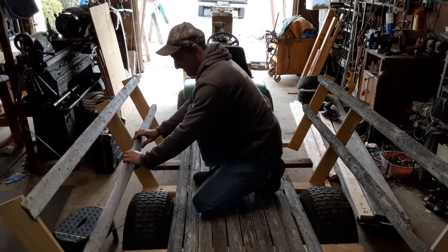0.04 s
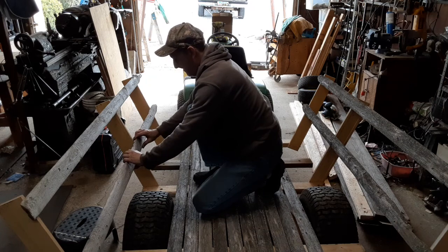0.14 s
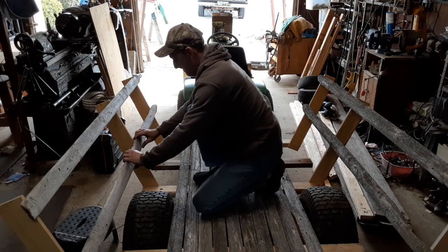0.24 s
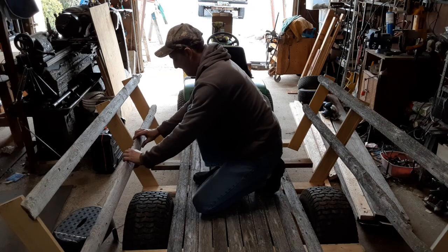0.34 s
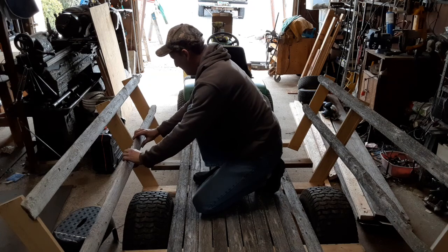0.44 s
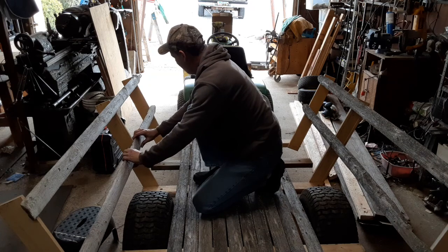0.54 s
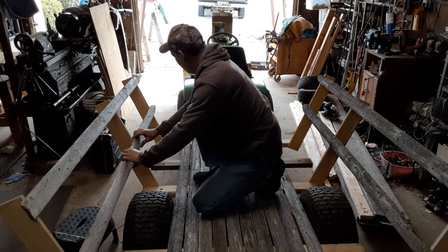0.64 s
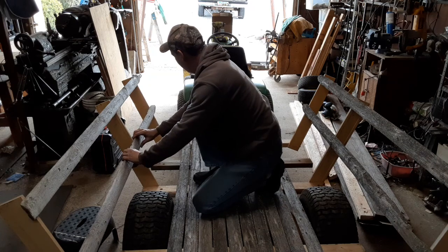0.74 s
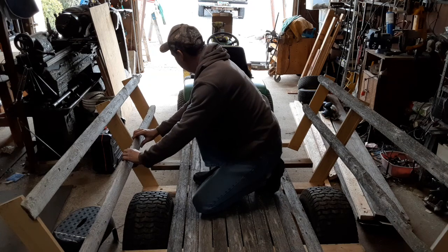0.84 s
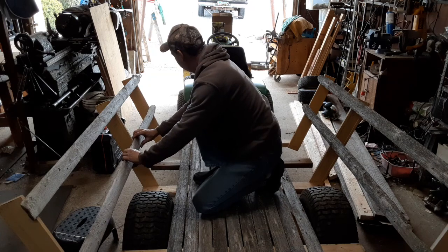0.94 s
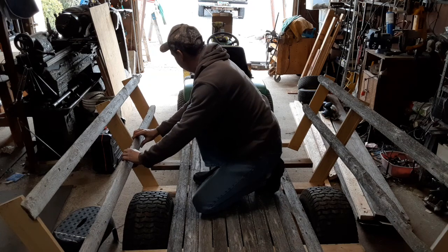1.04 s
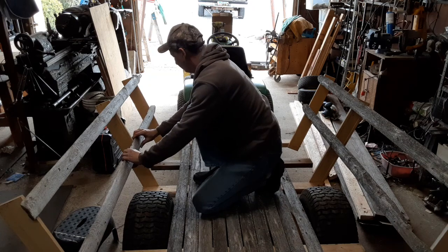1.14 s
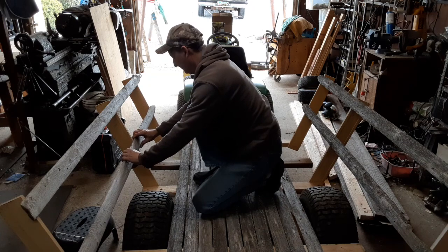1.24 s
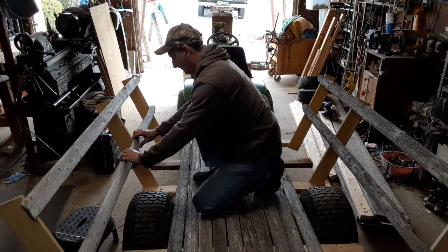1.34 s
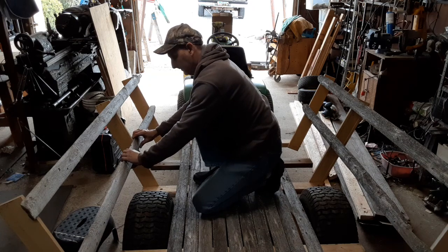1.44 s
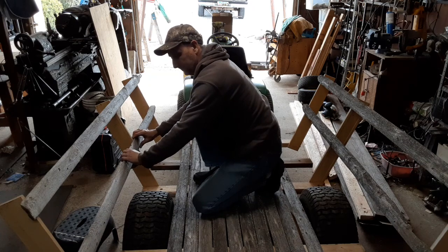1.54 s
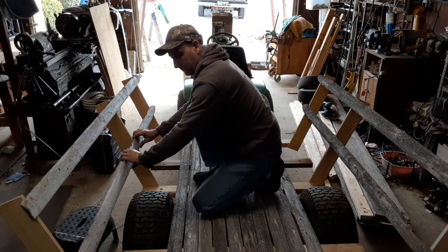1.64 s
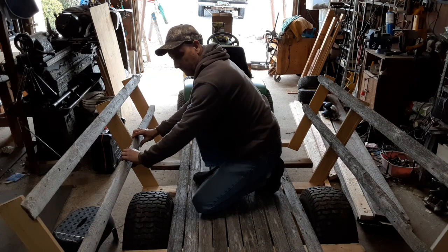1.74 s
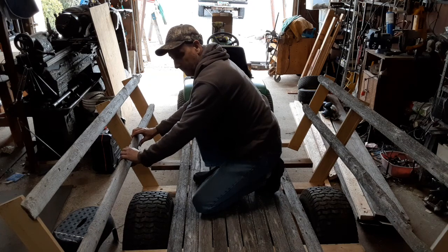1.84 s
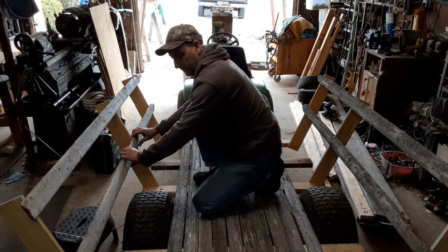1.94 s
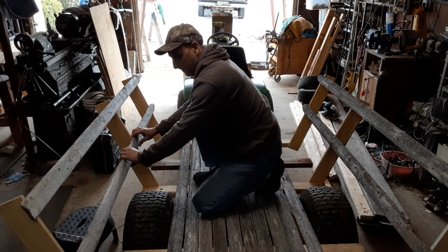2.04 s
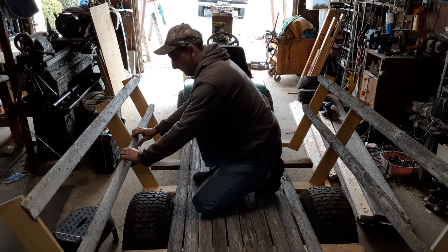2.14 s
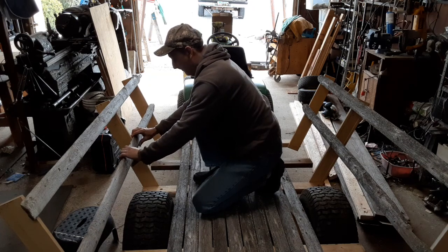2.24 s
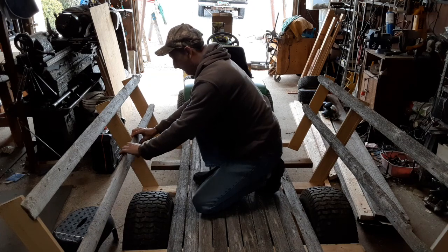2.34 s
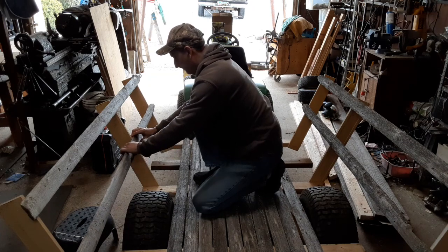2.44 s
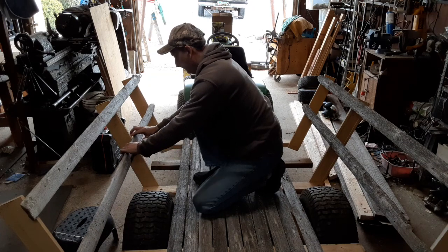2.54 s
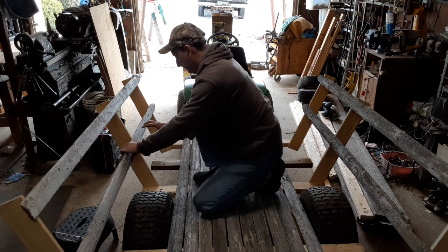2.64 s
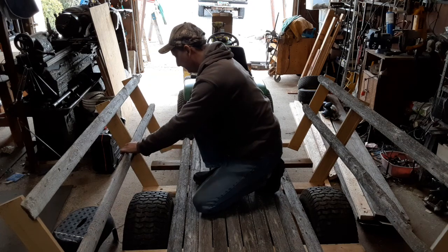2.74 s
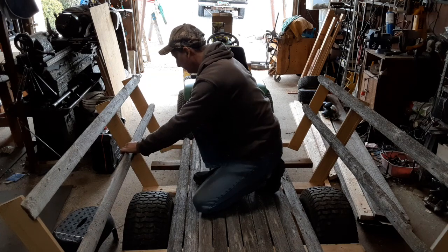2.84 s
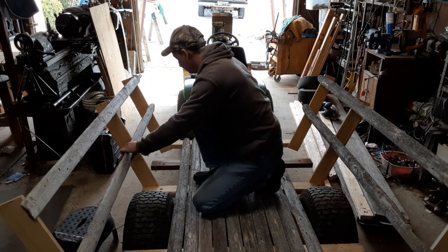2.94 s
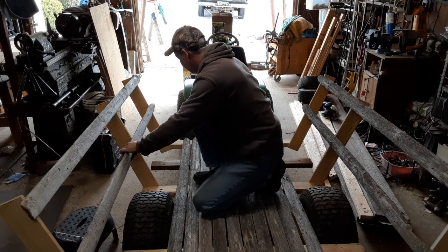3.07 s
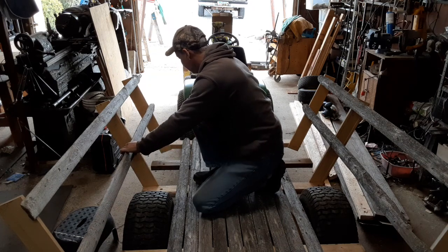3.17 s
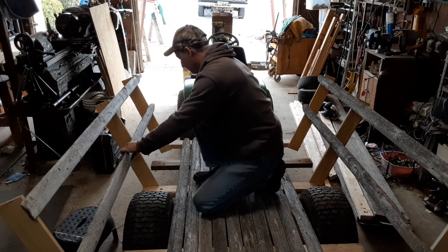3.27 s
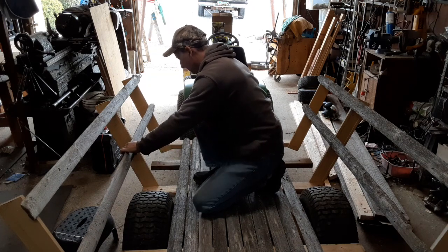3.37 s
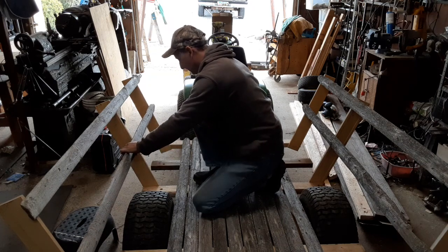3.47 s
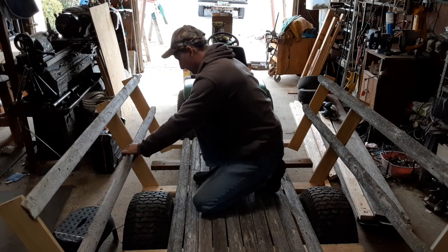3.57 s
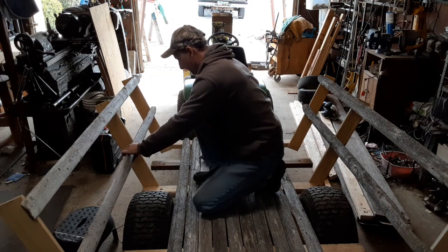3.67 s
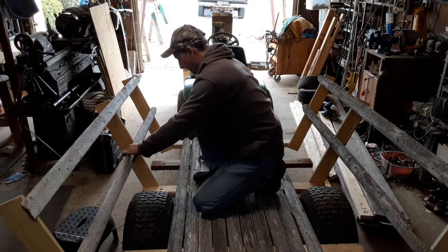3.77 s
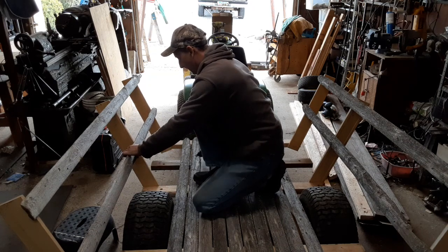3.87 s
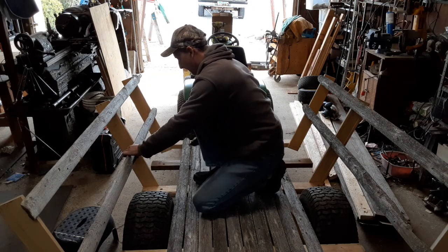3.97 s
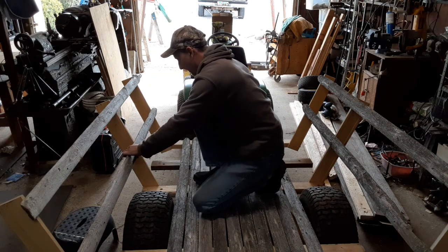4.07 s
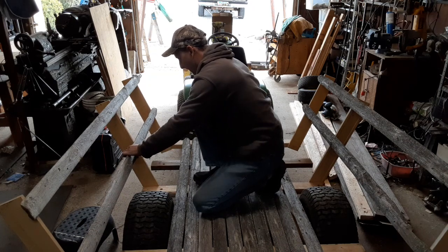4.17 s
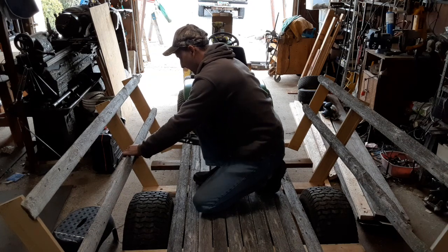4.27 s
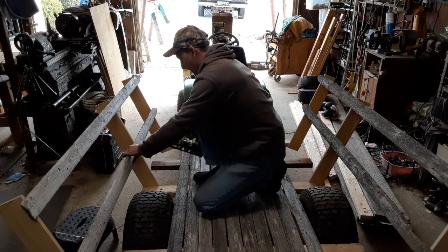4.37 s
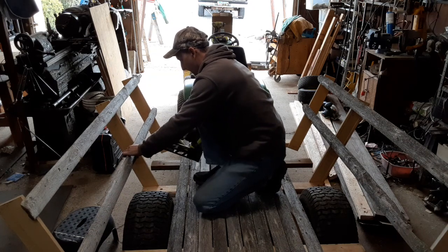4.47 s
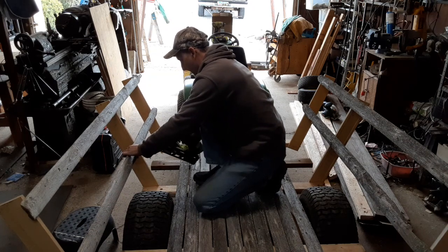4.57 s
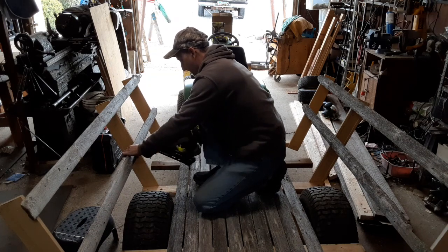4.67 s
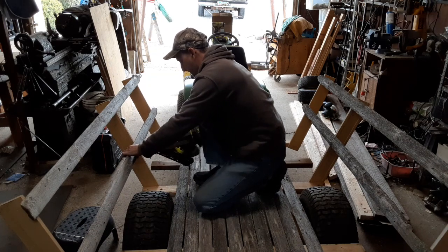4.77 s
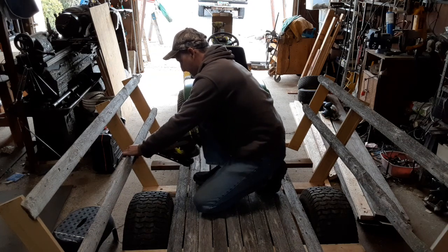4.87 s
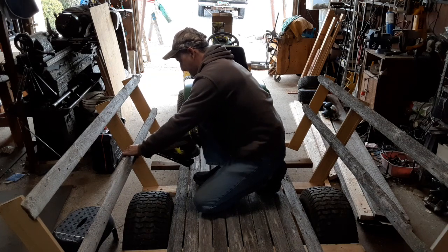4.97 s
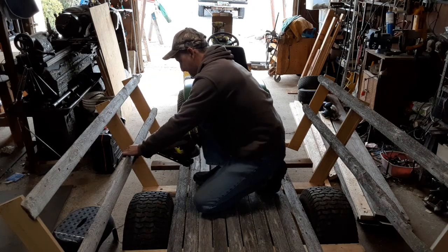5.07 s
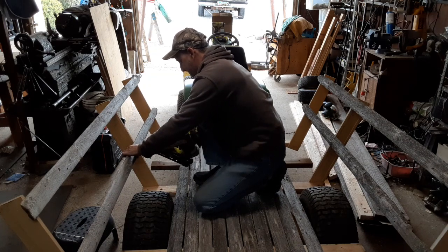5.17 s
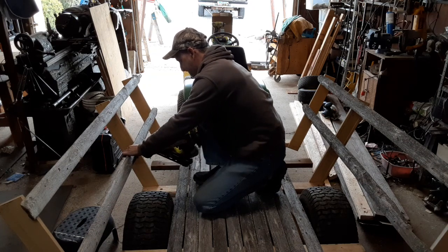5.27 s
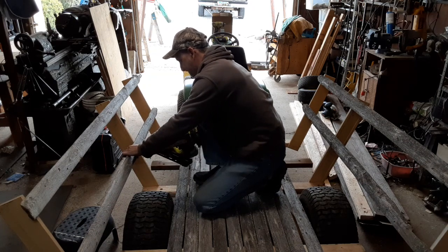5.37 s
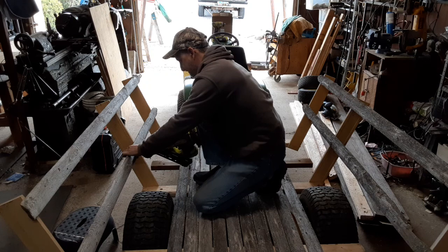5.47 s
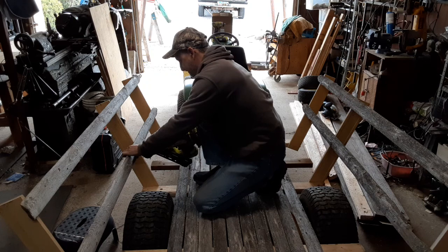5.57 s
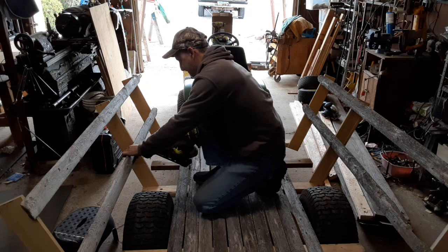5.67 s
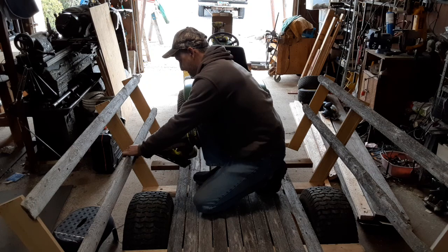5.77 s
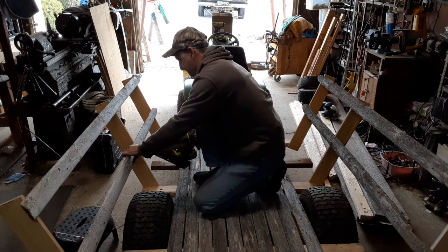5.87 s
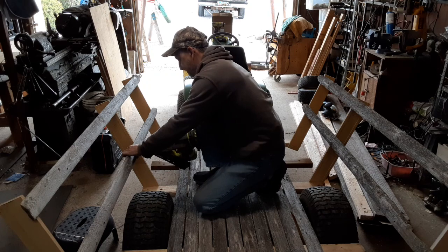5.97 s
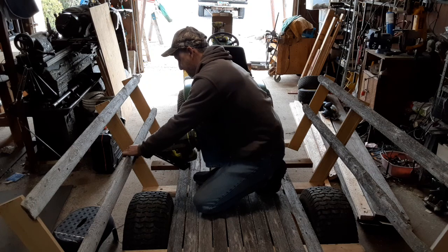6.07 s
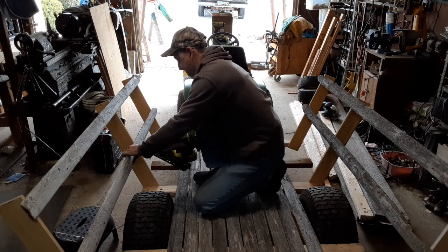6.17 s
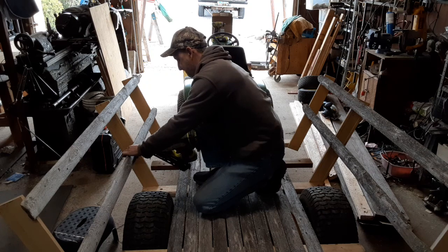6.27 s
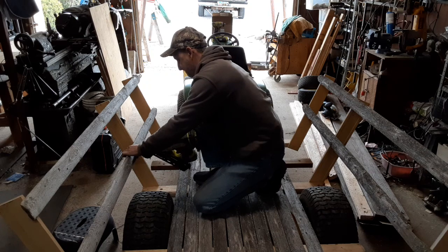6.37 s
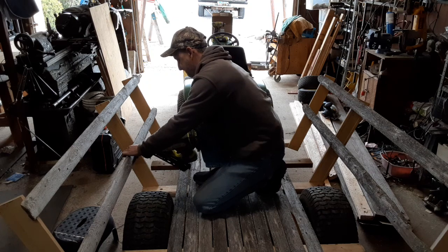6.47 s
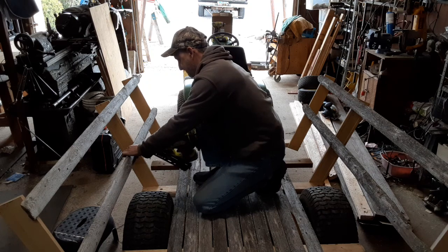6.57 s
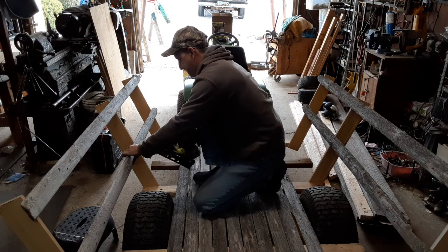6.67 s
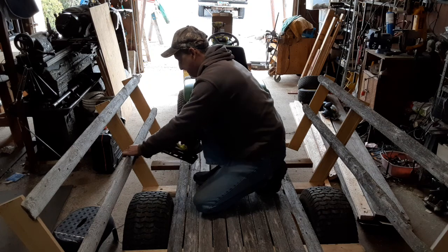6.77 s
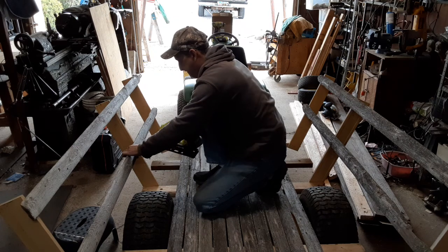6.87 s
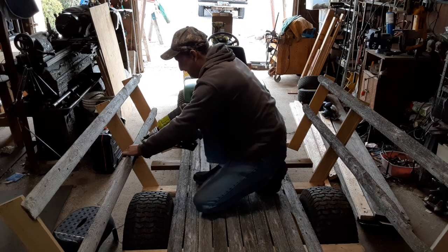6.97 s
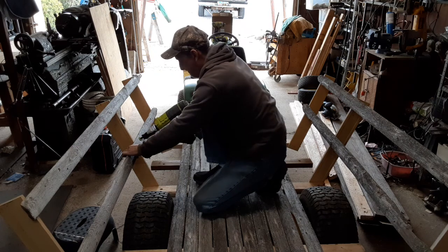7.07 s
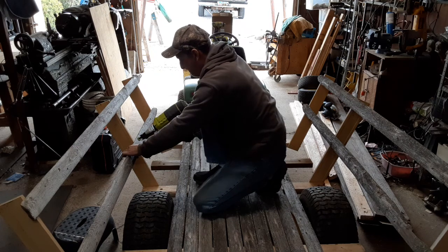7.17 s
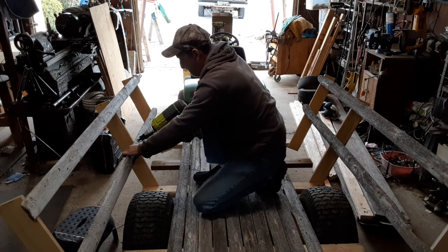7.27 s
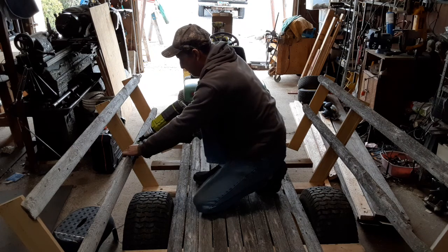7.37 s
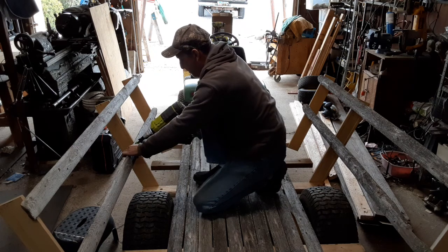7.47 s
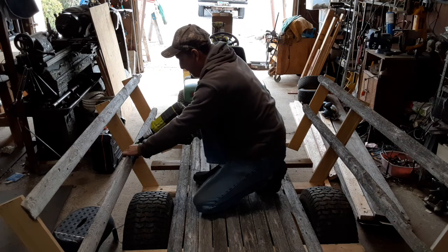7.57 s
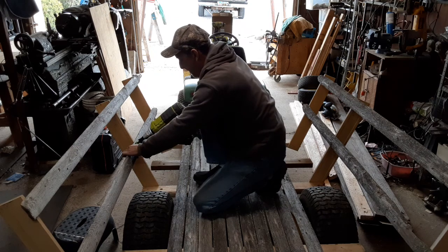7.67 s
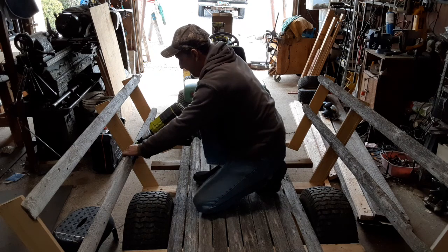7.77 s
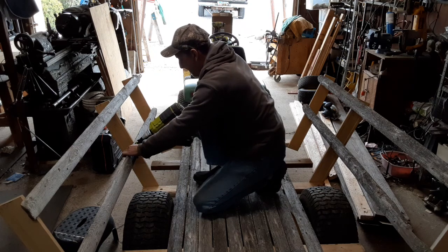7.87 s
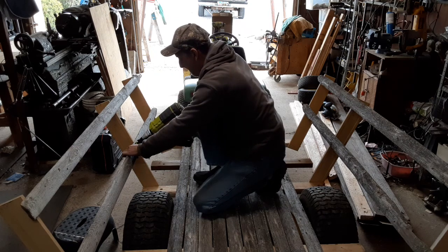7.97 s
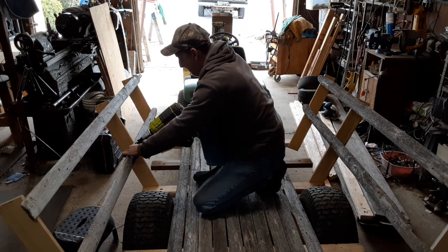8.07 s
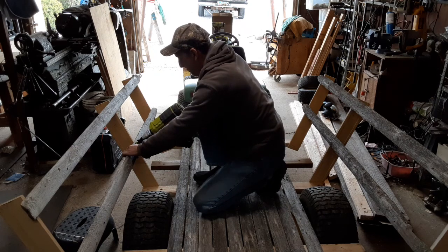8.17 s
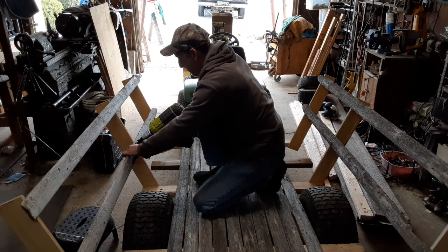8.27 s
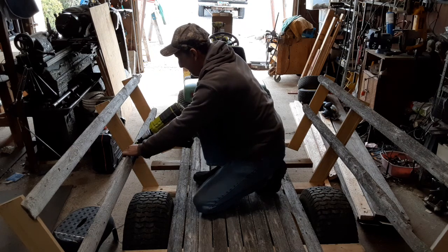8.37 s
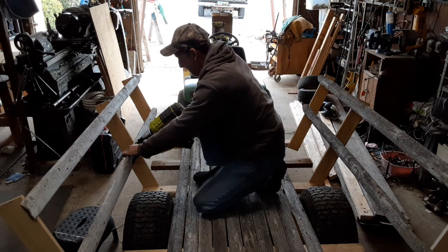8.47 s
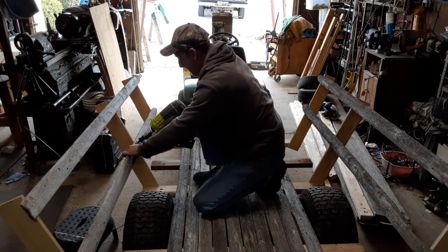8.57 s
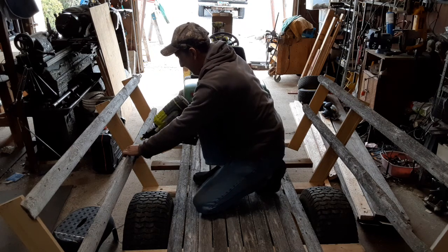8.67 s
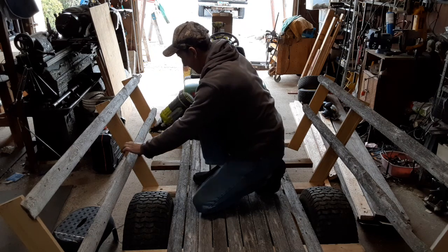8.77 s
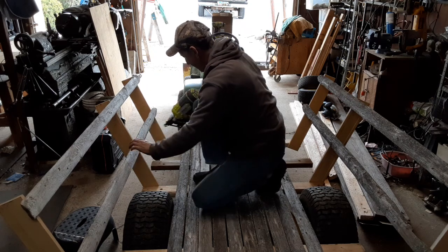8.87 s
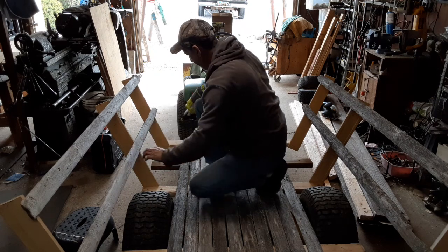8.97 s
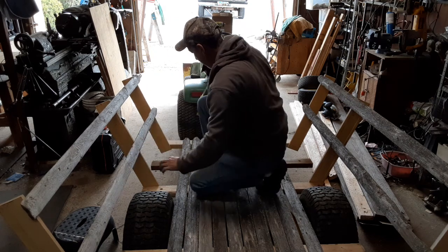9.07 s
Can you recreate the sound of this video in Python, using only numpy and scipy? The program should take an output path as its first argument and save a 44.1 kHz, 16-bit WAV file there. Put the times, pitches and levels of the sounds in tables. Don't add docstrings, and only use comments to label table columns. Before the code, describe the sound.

Stereo camera microphone nearby in a cluttered garage with short reverberation. Dry friction of sleeves and boards comes and goes, with one hollow double knock of wood. Then a battery nail gun fires twice: plastic click, catch clack, brief gear whine, sharp woody blast, short ringing decay, coasting whir and braking buzz with a latch click. Background drops after the first shot as the gain ducks.

```python
import sys
import numpy as np
from scipy import signal
from scipy.fft import rfft, irfft, next_fast_len
from scipy.io import wavfile
from scipy.ndimage import uniform_filter1d

SR = 44100
rng = np.random.default_rng(int(sys.argv[2]) if len(sys.argv) > 2 else 0)


def boost(x):
    u = np.asarray(x, float) / 20
    return 10 ** u


def store_wav(level_fs):
    pcm = np.round(np.clip(np.atleast_2d(level_fs), -1, 1) * 32767)
    wavfile.write(sys.argv[1], SR, pcm.T.astype(np.int16))


N = 401751
T = np.arange(N) / SR


def evened(x):
    return x / np.sqrt(np.mean(x ** 2) + 1e-20)


def wander(size):
    return evened(uniform_filter1d(rng.standard_normal(N), size=size))


def tent(t, s, db, rise, fall):
    return db - np.where(t < s, (s - t) * rise, (t - s) * fall)


def curve(rows, axis=1):
    return np.interp(T, np.array(rows)[:, 0], np.array(rows)[:, axis])


def during(t, start, end):
    return uniform_filter1d(1. * (t >= start) * (t < end), size=88)


def read(points, hz):
    f, value = np.transpose(points)
    return np.interp(np.log(hz + 1), np.log(f + 1), value)


def panned(pan_db):
    return boost([[pan_db / 2], [-pan_db / 2]])


def band(x, lo_hz, hi_hz):
    size = next_fast_len(N)
    hz = np.fft.rfftfreq(size, 1 / SR)
    low_cut = 1 + (lo_hz / (hz + 1)) ** 8
    high_cut = 1 + (hz / hi_hz) ** 8
    return evened(irfft(rfft(x, size) / low_cut / high_cut, size)[:, :N])


# (frequency [Hz], left-right likeness [-1 to 1])
COHERENCE = [(60, 0.94), (180, 0.98), (550, 0.66), (1650, -0.12), (4970, 0.085), (15000, -0.24)]
# (frequency [Hz], left-right level [dB])
LEAN = [(60, 0.5), (240, 0.0), (950, -0.5), (3770, 0), (15000, -2)]


def coherent(left, other, hz):
    same = np.clip(read(COHERENCE, hz), -1, 1)[:, None]
    return np.array([left, same * left + np.sqrt(1 - same ** 2) * other])


def noise(colour, peaks=(), patchy_db=1.5, flicker_db=1.):
    frames, hz = N // 256 + 5, np.fft.rfftfreq(1024, 1 / SR)
    a, b, c, d, patches = rng.standard_normal((frames, 513, 5), dtype=np.float32).T
    patches = uniform_filter1d(patches, size=10, axis=0)
    patches = evened(uniform_filter1d(patches, size=8, axis=1))
    z = coherent(a + 1j * b, c + 1j * d, hz)
    resonances = sum(boost(db) / np.hypot(1, 2 * (hz - f) / width) for f, width, db in peaks)
    shape = boost(read(colour, hz)) * (1 + resonances)
    lean = boost(np.array([.5, -.5])[:, None] * read(LEAN, hz))
    z = z * (shape * lean)[..., None] * boost(patchy_db * patches)
    sound = signal.istft(z, nperseg=1024, noverlap=768)[1][:, :N]
    return sound * boost(flicker_db * wander(130))


def two_band(x, low_db, high_db, lo_hz, top_db=0):
    high = band(x, 1500, 17000)
    top = signal.sosfilt(signal.butter(2, 5500, "high", fs=SR, output="sos"), high)
    high = high + (boost(top_db) - 1) * top
    return boost(low_db) * band(x, lo_hz, 1500) + boost(high_db) * high


def tones(partials, wobble):
    drift = np.cumsum(1 + wobble * wander(400)) / SR
    return evened(sum(boost(db) * np.sin(2 * np.pi * hz * drift) for hz, db in partials))


def singing(rows, fade, lead):
    out = np.zeros((2, N))
    for s, db, hz, pan_db in rows:
        phase = 2 * np.pi * hz * T + np.array([[lead], [0]])
        out += boost(tent(T, s, db + 3, fade, fade)) * panned(pan_db) * np.sin(phase)
    return out


# (frequency [Hz], density [dB per Hz])
DISTANT = [(15, -57), (25, -34), (50, -9), (63, 3), (89, 0), (145, -16), (198, -10), (251, -12),
           (300, -14.5), (390, -37), (660, -120)]
# (time [s], level [dB])
RUMBLE = [(0.0, -69), (0.1, -61), (0.56, -56), (0.99, -57), (1.49, -53.5), (3.14, -54.5), (6.47, -54.5),
          (6.88, -67.5), (7.13, -74), (7.79, -68), (8.27, -63), (8.6, -67), (9.11, -74.5)]


def outdoor_rumble():
    return boost(curve(RUMBLE)) * band(noise(DISTANT, patchy_db=1.5, flicker_db=0.6), 45, 120)


# (frequency [Hz], density [dB per Hz])
HISS = [(1470, -26.5), (2500, 3.5), (3160, -10.5), (3920, -9), (9510, -18), (12500, -7), (16000, -3)]


def microphone_hiss():
    gain_db = uniform_filter1d(curve(RUMBLE), size=30000) + 55
    return boost(.8 * gain_db - 67.5) * evened(noise(HISS, patchy_db=0.3, flicker_db=-2.0))


# (time [s], level [dB], relative treble [dB], rise [s per 10 dB], fall [s per 10 dB])
MOVES = [(.03, -49, -1, .1, .3), (.2, -50.5, 2, .2, .25), (.4, -50, 1, .2, .3), (.55, -50, 0, .2, .15),
         (.72, -60, 0, .03, .1), (.81, -58, 1, .1, .07), (1.11, -62, 0, .03, .2), (1.2, -58, 0, .1, .2),
         (1.29, -53, -1, .15, .1), (1.53, -44, 1, .1, .08), (1.66, -48, 2, .03, .2),
         (1.73, -46, 2, .1, .15), (1.81, -49, 2, .1, .15), (2.04, -51, 2, .06, .3), (2.13, -49, 2, .2, .2),
         (2.24, -46.5, 3, .1, .12), (2.36, -51, 2, .03, .3), (2.48, -49, 2, .2, .3),
         (2.58, -42.5, 3, .08, .25), (2.82, -46.5, 1, .3, .3), (2.93, -48.5, 1, .2, .1),
         (3.12, -48.5, -1, .15, .14), (3.33, -45, 0, .025, .3), (3.55, -39, 2, .2, .2),
         (3.7, -43, 1, .2, .15), (3.76, -44, 1, .05, .08), (3.92, -44.5, 1, .08, .15),
         (4.1, -48, 1, .3, .3), (4.26, -50, 1, .3, .15), (4.49, -49, 1, .07, .3), (4.59, -36, 2, .025, .09),
         (4.76, -49.5, 1, .2, .2), (4.92, -49, 1, .2, .2), (5.0, -50, 1, .1, .05), (5.23, -54, 1, .15, .2),
         (5.36, -50, 2, .15, .15), (5.56, -52, 0, .1, .1), (5.68, -50, 1, .1, .2), (5.77, -45.5, 1, .1, .2),
         (5.93, -39, 1, .09, .19),
         (7.0, -62, -3, .1, .2), (7.25, -68, 1, .2, .2), (7.41, -65.5, 2, .03, .3),
           (7.6, -69, 3, .2, .06), (7.9, -59, -1, .14, .5), (6.168, -54, 8, .003, .07),
           (8.047, -61, 9, .003, .06), (8.915, -62, 6.5, .004, .05), (9.058, -69, 8, .004, .05)]


def movements(still_db, treble):
    t = T[::64]
    steep = 10 + 1.5 * treble
    power = 0
    for s, db, treble_db, rise_s, fall_s in MOVES:
        peak_db = db - .6 + treble * (treble_db + .5)
        power = power + boost(2 * tent(t, s, peak_db, steep / rise_s, steep / fall_s))
    return 10 * np.log10(boost(2 * still_db) + np.interp(T, t, power))


# (frequency [Hz], density [dB per Hz])
CLOTH = [(59, -15), (100, 5), (166, -9), (202, 1.5), (244, -6.5), (452, -6), (502, -4.5), (558, -9.5),
         (608, -6), (1480, -9.5), (2690, -11.5), (12700, -28.5), (16000, -28)]
# (time [s], level [dB])
TICKS = [
    (6.166, -48),
    (8.046, -55),
    (8.918, -76),
    (9.058, -67),
]


def rustle():
    cloth = noise(CLOTH, patchy_db=1.15, flicker_db=0.62)
    still_db = -62.5 + .3 * (uniform_filter1d(curve(RUMBLE), size=20000) + 56)
    high_db = movements(-71, 1)
    top_db = .1 * (high_db + 52)
    rubbing = two_band(cloth, movements(still_db, 0), high_db, 110, top_db)
    ticks = sum(boost(tent(T, s, db, 4000, 170)) for s, db in TICKS)
    return rubbing + ticks * band(cloth, 8500, 16500)


# (frequency [Hz], width [Hz], level [dB])
RAIL = [
    (810, 150, 5),
    (646, 110, -5),
    (3070, 90, -7),
]


def sliding_hand():
    peaks = [(f, width, db + 36.0) for f, width, db in RAIL]
    scrape = evened(noise([(100, -27.5), (16000, -29)], peaks, patchy_db=2.3, flicker_db=2.2))
    return boost(tent(T, 7.495, -52.5, 130, 140)) * scrape


# (slam time [s], gain at the catch [dB], gain just before the slam [dB])
SHOTS = [
    (6.504, 0.1, 0.1),
    (8.3855, -6, -1.5),
]
SHOT = (T > np.mean(np.array(SHOTS)[:, 0])).astype(int)
SINCE = T - np.array(SHOTS)[SHOT, 0]
CHOP_S, CATCH_S, COAST_S, BRAKE_S, LATCH_S = -.322, -.292, .12, .265, .333
RUN = np.maximum(SINCE - CATCH_S, 0)


def winding_gain_db():
    _, catch_db, loaded_db = np.array(SHOTS)[SHOT].T
    return (loaded_db + (catch_db - loaded_db) * np.clip(SINCE / CATCH_S, 0, 1)) * (SINCE < 0)


# (frequency [Hz], density [dB per Hz])
GEARS = [(88, -65), (150, -22.5), (504, -23), (601, -15), (675, -22), (1140, -14.5), (1560, -10.5),
         (1660, -11), (1790, -12.5), (2810, -17), (3350, -13), (4000, -18.5), (8500, -21), (11500, -25),
         (16000, -24)]
# (frequency [Hz], width [Hz], level [dB])
HOUSING = [(2140, 44, -6), (2360, 84, -2.5), (2820, 54, -5), (3270, 810, -11), (5080, 85, -8),
           (6700, 60, -10), (11700, 73, -14.5)]


def gear_rattle():
    gain_db = winding_gain_db()
    teeth = noise(GEARS, [(f, width, db + 6.) for f, width, db in HOUSING], patchy_db=1.86, flicker_db=1.0)
    winding_db = tent(SINCE, -.01, -33, 3, 400) - 99 * (SINCE < CATCH_S)
    low_db = np.maximum(tent(SINCE, -.29, -25, 900, 130), winding_db)
    high_db = -23.7 - 12 * np.exp(-RUN / .03)
    high_db = high_db + 480 * np.minimum(SINCE - CATCH_S, 0)
    rattle = two_band(teeth, low_db + gain_db, high_db + gain_db, 150)
    brake = boost(-46) * (SINCE > BRAKE_S) * (SINCE < BRAKE_S + .07)
    fan = boost(-52) * (SINCE > COAST_S) * (SINCE < LATCH_S + .02)
    air = uniform_filter1d(brake + fan, size=300) * band(teeth, 9500, 16500)
    return during(SINCE, CHOP_S - .02, .008) * rattle + air


# (frequency [Hz], density [dB per Hz])
COASTING = [(88, -46), (150, -27), (193, 0), (280, -23.5), (398, -23.5), (1040, -20), (1530, -24.5),
            (2220, -17), (6020, -29), (11500, -36.5), (16000, -36.5)]


def coasting_gears():
    latched = SINCE > LATCH_S
    low_db = np.where(latched, tent(SINCE, .333, -31, 3000, 170), tent(SINCE, .3, -38, 90, 60))
    latch_high_db = low_db + tent(SINCE, .345, 4, 300, 55)
    high_db = np.where(latched, latch_high_db, tent(SINCE, .28, -36, 30, 20))
    top_db = -65 * np.maximum(SINCE - LATCH_S, 0)
    run_down = two_band(noise(COASTING, patchy_db=1.0, flicker_db=1.3), low_db, high_db, 254, top_db)
    return during(SINCE, COAST_S, .8) * run_down


# (frequency [Hz], level [dB])
HUM = [
    (197, 2.5),
    (135, -20),
    (405, -7),
    (615, -16),
    (810, -22),
]


def stalled_hum():
    starting_db = tent(SINCE, -.29, -31, 1400, 170) + winding_gain_db()
    braking_db = np.minimum(tent(SINCE, .342, -27.5, 330, 420), tent(SINCE, .305, -40, 900, -900))
    heard = during(SINCE, -1, 1) * (1 - during(SINCE, -.2, .2))
    return boost(np.maximum(starting_db, braking_db)) * heard * tones(HUM, .03)


# (frequency [Hz], level [dB])
CHOPPER = [
    (3920, -3.5),
    (7840, -5),
    (11760, 1.5),
    (15680, -3),
]


def chopper():
    start = boost(-50 + winding_gain_db()) * (SINCE > CHOP_S) * (SINCE < CATCH_S + .003)
    low = start + boost(-50) * (T > 6.77) * (T < 6.9)
    chop = uniform_filter1d(low, size=300) * boost(2.4 * wander(150)) * tones(CHOPPER[:1], .003)
    return chop + boost(-2.0) * uniform_filter1d(start, size=300) * tones(CHOPPER[1:], .002)


# (time [s], left level [dB], right level [dB], left lead [rad])
WHINE = [(6.225, -42, -42, 1.6), (6.26, -35, -32, 1.8), (6.29, -30, -27, 1.8), (6.34, -29.5, -28.5, .8),
         (6.365, -40, -37, -1), (6.4, -20, -30, -1.7), (6.44, -16.5, -31, -.6), (6.5, -19, -34, .3),
         (8.105, -46, -46, 1.3), (8.145, -43, -42, 1.6), (8.18, -46, -48, 1), (8.22, -35, -34, -.2),
         (8.245, -43, -40, 0), (8.27, -31, -38, 2.4), (8.325, -18.5, -29, 1.7), (8.35, -21, -26.5, 1.6),
         (8.384, -28, -33, 1.2)]
# (time [s], left level [dB], right level [dB])
OCTAVE = [(6.235, -45, -48), (6.28, -27, -33), (6.31, -31, -36), (6.34, -30, -28), (6.39, -36, -35),
          (6.44, -35, -34), (6.48, -28.5, -32), (6.5, -31, -35), (8.115, -46, -46), (8.14, -33, -32),
          (8.165, -37, -34), (8.19, -32, -29), (8.225, -35, -38), (8.26, -34, -29), (8.28, -38, -30),
          (8.31, -30, -30), (8.345, -36, -29), (8.384, -31, -28)]
# (time [s], level [dB], frequency [Hz], left-right level [dB])
STRANDS = [(6.3, -35, 1272, -5), (6.3, -36, 3004, 0), (6.33, -33.5, 2197, 2), (6.33, -34, 2352, 6),
           (6.35, -32, 3330, 0), (6.39, -33, 3255, 0), (6.47, -36, 2358, 1), (8.145, -37, 3370, 0),
           (8.21, -38, 1925, 0), (8.325, -32, 2125, 2), (8.34, -35, 2408, 2), (8.335, -32.5, 3228, 2)]


def gear_mesh():
    hz = 1752 * (1 - .16 * np.exp(-RUN / .021))
    hz = hz - (1752 - 1660) / (1 + np.exp((.165 - RUN) / .035))
    hz = hz - 20 * np.exp(np.minimum(SINCE, 0) / .008)
    turns = np.cumsum(hz * (1 + .002 * wander(200))) / SR
    whine_db = np.array([curve(WHINE, axis=1), curve(WHINE, axis=2)])
    rough = np.clip((-28. - whine_db.max(0)) / 8., 0, 1)
    phase = 2 * np.pi * turns + np.outer([1, 0], curve(WHINE, axis=3))
    mesh = boost(whine_db + 3. + 2.5 * rough * wander(300)) * np.sin(phase)
    octave = 2 * 2 * np.pi * turns + np.array([[1.9], [0]])
    fuzz = wander(80) * np.sin(octave) + wander(80) * np.cos(octave)
    octave_gain = boost([curve(OCTAVE, axis=1), curve(OCTAVE, axis=2)])
    mesh += octave_gain * (1.2 * np.sin(octave) + .7 * fuzz)
    mesh += singing(STRANDS, 130, .9)
    return during(SINCE, CATCH_S + .012, -.003) * mesh


def ring(hz, t60):
    t = np.arange(8000) / SR
    return np.sin(2 * np.pi * hz * t) * boost(-60 * t / t60) * (1 - np.exp(-t * 2500.))


def add(mix, s, sound, pan_db):
    part = mix[:, round(s * SR):][:, :sound.shape[-1]]
    part += panned(pan_db) * sound[..., :part.shape[1]]


# (time [s], peak level [dB])
BUMPS = [
    (3.752, -22),
    (3.7585, -16),
    (3.787, -23),
    (3.805, -23),
    (3.811, -26),
]
# (frequency [Hz], level [dB], T60 [s])
PLANK = [(204, -17, .3), (131, -19, .04), (217, -12, .04), (250, -6, .04), (280, -6, .045),
         (340, -4.5, .06), (410, -12, .04), (600, -18, .03), (720, -21, .03), (1250, -24, .025),
         (1800, -26, .02)]


def bumping_plank():
    out = np.zeros((2, N))
    knock = sum(boost(db) * ring(hz, t60) for hz, db, t60 in PLANK)
    knock = signal.lfilter(*signal.butter(2, 150., "high", fs=SR), knock)
    for s, db in BUMPS:
        add(out, s, boost(db) * knock, 0)
    return out


# (time [s], peak level [dB], ring frequency [Hz], left-right level [dB])
TRIGGER = (.024, .3), [(6.166, -32.5, 4130, -7), (6.1665, -40, 4500, -3.5), (8.046, -39, 4280, -1),
           (8.0465, -43, 4590, -3.5)]
CATCH = (.016, .05), [(6.2093, -6.5, 1130, -2), (6.22, -15, 1225, 0), (6.2225, -17, 1400, -8),
         (8.089, -18, 1420, 7), (8.102, -18.5, 1270, -6)]
DRIVER = (.008, .02), [(6.5043, 2.5, 1060, 0), (6.5052, -6, 440, 0), (6.5074, -13, 880, -.5),
          (8.38, -18, 760, 1), (8.3856, -5.5, 870, -1.5), (8.3868, -6, 500, 0)]
NAIL = (.013, .27), [(6.5125, -4, 1303, 4), (6.5155, -3, 1530, -3), (8.392, -8.5, 2200, -6.5),
        (8.394, -9, 1540, -2), (8.3955, -9, 1800, 0), (8.398, -10, 1600, -.5)]
CAM = (.022, .2), [(6.782, -31, 1040, 1), (6.802, -21.5, 1045, -4), (6.837, -24, 620, 2),
       (8.664, -33, 1000, 4), (8.683, -27, 1000, 1), (8.719, -26, 1200, 1)]
PAWL = (.05, .3), [(6.732, -34, 2230, -9), (6.8, -28, 2140, -1), (8.681, -26.5, 2280, -6)]
STOP = (.03, .6), [(6.837, -23.5, 3365, 4), (8.719, -28, 3990, 8)]
GRIT = (.012, .15), [(3.751, -27, 2140, -2), (8.913, -58, 2130, -1)]
SWITCH = (.012, .3), [(6.732, -42, 11000, 0), (6.8, -40, 12500, 0), (8.657, -40, 11800, 0)]


def gun_parts():
    out = np.zeros((2, N))
    for (t60, crack), blows in (TRIGGER, CATCH, DRIVER, NAIL, CAM, PAWL, STOP, GRIT, SWITCH):
        for s, db, hz, pan_db in blows:
            low, high = rng.uniform(1.0, 1.15, 2)
            body = ring(hz, t60) + 0.18 * ring(.62 * low * hz, t60) + 0.15 * ring(high * hz, 0.67 * t60)
            snap = rng.standard_normal((2, 8000)) * np.exp(-np.arange(8000) / 220.0)
            add(out, s, boost(db) * (body + crack * snap), pan_db)
    return out


# (peak level [dB], frequency [Hz], T60 [s], left-right level [dB])
JOLTS = [
    [(-27, 100, .09, 18), (-35, 65, .1, 10), (-17.5, 196, 0.12, -0.5)],
    [(-26, 88, 0.11, 18), (-31, 65, .12, 14), (-24, 200, .14, 2.5)],
]


def jolts():
    out = np.zeros((2, N))
    for (s, _, _), rows in zip(SHOTS, JOLTS):
        for db, hz, t60, pan_db in rows:
            add(out, s + .007, boost(db) * ring(hz, t60), pan_db)
    return out


# (frequency [Hz], density [dB per Hz])
BLAST = [(24, -50.5), (40, -20), (165, -28), (329, -4.5), (479, -17.5), (600, -5), (1210, -16.5),
         (1520, -6), (2000, -16.5), (2840, -13.5), (3830, -18), (12500, -30.5), (16000, -30.5)]
# (frequency [Hz], level [dB])
RINGING = [(199, -5.5), (285, 2), (337, 1), (405, -5.5), (610, -4), (722, -4), (1125, -7.5), (1495, -3.5)]
# (time [s], level [dB], frequency [Hz], left-right level [dB])
BOARDS = [(6.528, -25, 331, 0), (6.535, -33, 608, 0), (6.54, -30, 700, 0), (6.558, -26, 282, 0),
          (6.57, -32, 374, 0), (6.605, -30, 347, 0), (6.645, -38, 325, 0), (6.7, -42, 320, 0),
          (8.402, -29, 600, 0), (8.423, -25, 328, 0), (8.422, -30, 570, 0), (8.43, -31, 398, 0),
          (8.443, -27.5, 312, 0), (8.455, -29, 705, 0), (8.48, -35, 339, 0), (8.53, -39, 322, 0)]


def slam():
    limited_db = np.minimum(tent(SINCE, .008, -18.5, 3000, 65), tent(SINCE, .09, -24, -900, 165))
    level_db = np.maximum(tent(SINCE, .009, -16, 3000, 500), limited_db)
    high_db = level_db + np.maximum(tent(SINCE, .045, 4, 100, 30), 1.2)
    build_db = level_db - 9 * np.exp(-np.maximum(SINCE, 0) / .022)
    blast = noise(BLAST, patchy_db=0.5, flicker_db=-0.2)
    wash = boost(level_db - 28. - 70 * SINCE) * band(blast, 53, 125)
    wash += boost(build_db - 6.5) * band(blast, 190, 480)
    wash += boost(level_db - 1.5) * band(blast, 480, 1500)
    wash += boost(high_db - 1.5) * band(blast, 1500, 4500)
    wash += boost(high_db - 3.5 - 62 * SINCE) * band(blast, 4500, 17000)
    modes = sum(boost(db + 2.4 * wander(1200)) * tones([(hz, 0)], .012) for hz, db in RINGING)
    boards = during(SINCE, .004, .4) * singing(BOARDS, 300, .15)
    return boost(-1.0) * wash + boost(build_db - 8.0) * evened(modes) + boards


# (frequency [Hz], T60 [s])
GARAGE = [(100, 0.42), (500, .3), (2000, 0.18), (8000, 0.26)]


def garage(x):
    taps = np.zeros((2, SR // 2))
    slots = np.arange(200, SR // 2 - 22, 22)
    at = slots + rng.integers(0, 22, (2, len(slots)))
    np.put_along_axis(taps, at, rng.choice([-1., 1.], at.shape), 1)
    hz, t, z = signal.stft(taps, SR, nperseg=256)
    decay = boost(-60 * t / read(GARAGE, hz)[:, None])
    tail = signal.istft(coherent(z[0], z[1], hz) * decay, SR, nperseg=256)[1]
    return signal.fftconvolve(x, tail / np.linalg.norm(tail[0]), axes=1)[:, :N]


def scene():
    background = outdoor_rumble() + microphone_hiss() + rustle() + sliding_hand()
    motor = gear_rattle() + coasting_gears() + stalled_hum()
    whine = chopper() + gear_mesh()
    struck = bumping_plank() + gun_parts() + jolts()
    echoes = garage(boost(-5.0) * struck + boost(-13.) * whine)
    return background + motor + whine + struck + slam() + echoes


def low_pass(x):
    return signal.sosfilt(signal.butter(12, 16660, fs=SR, output="sos"), x)


def record(dry):
    dry = signal.sosfilt(signal.butter(4, 54., "high", fs=SR, output="sos"), dry)
    port_hz, width_hz, port_db = 11900, 2600, 3.5
    port = signal.lfilter(*signal.iirpeak(port_hz, port_hz / width_hz, fs=SR), dry)
    dry = dry + (boost(port_db) - 1) * port
    limited = np.tanh(dry / 1.2) * 1.2
    edge = signal.firwin(511, 15760, window=("kaiser", 9), fs=SR)
    mix = signal.oaconvolve(limited, edge[None], "same")
    return low_pass(mix)


dry = scene()
out = record(dry)
store_wav(out)
```